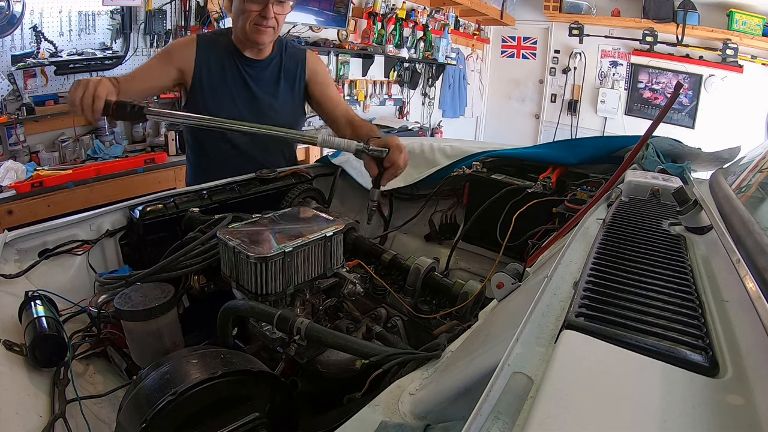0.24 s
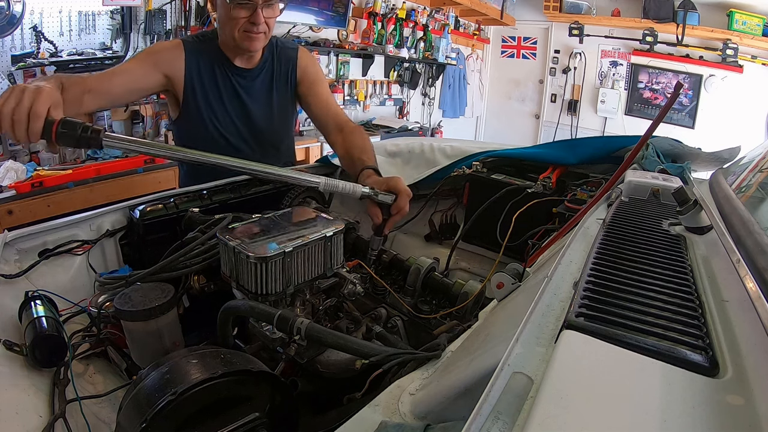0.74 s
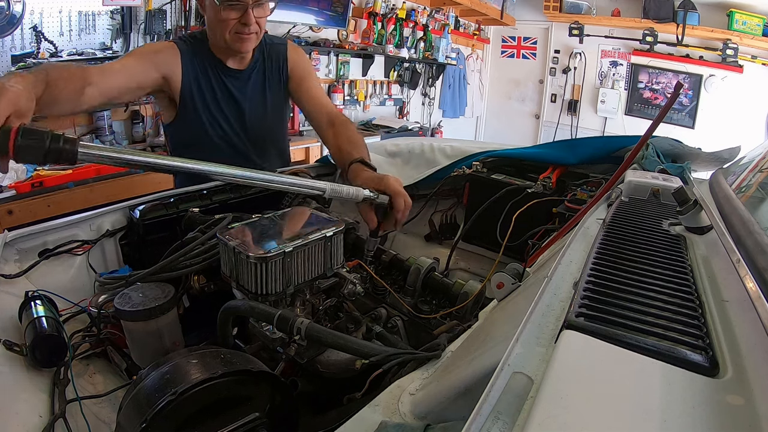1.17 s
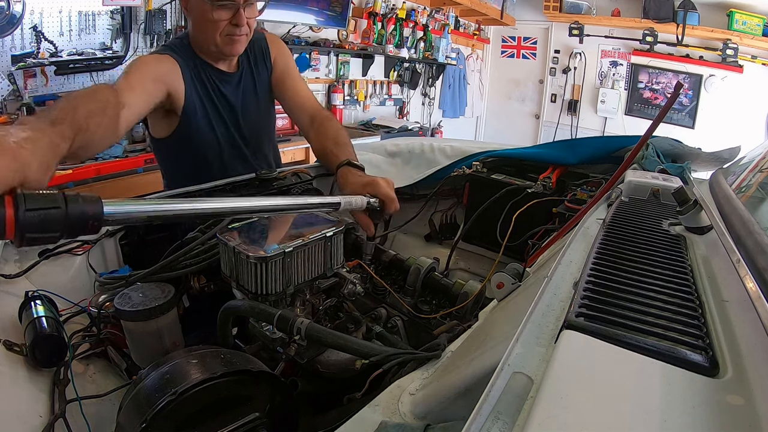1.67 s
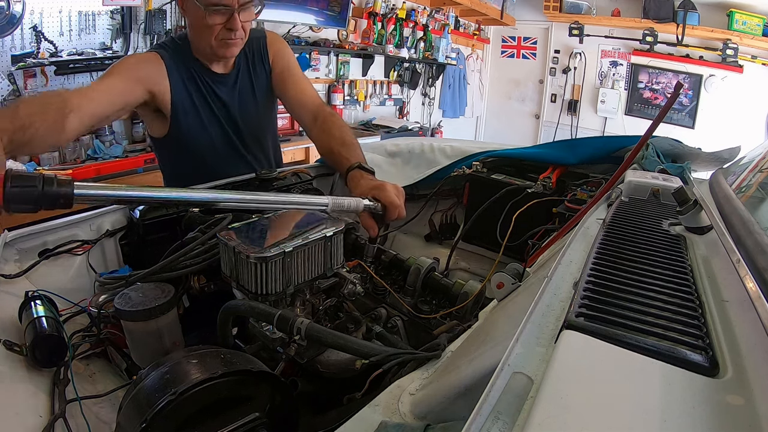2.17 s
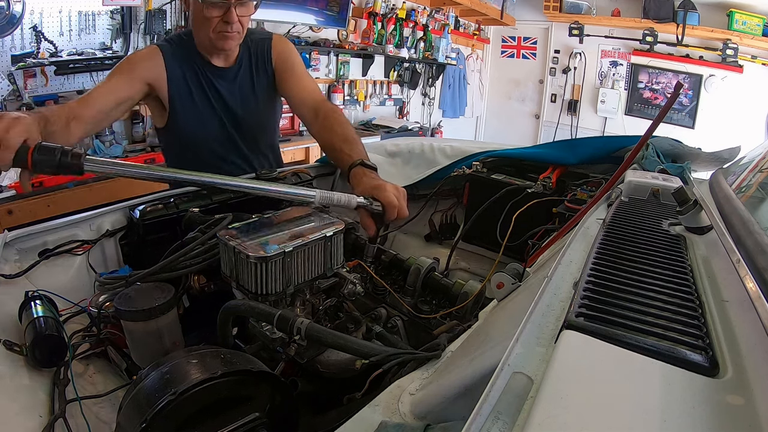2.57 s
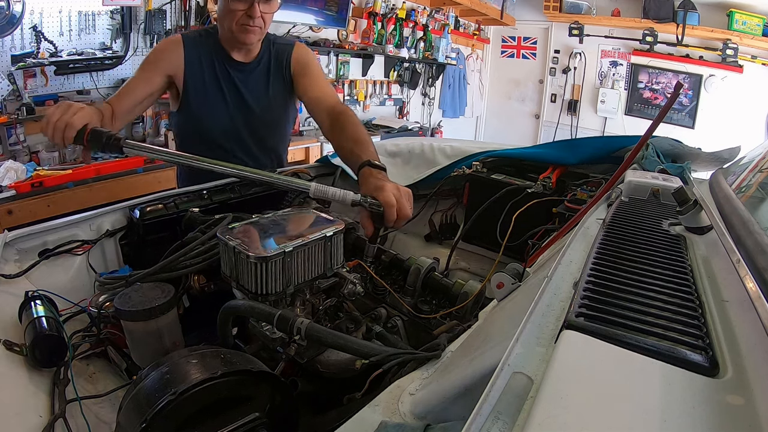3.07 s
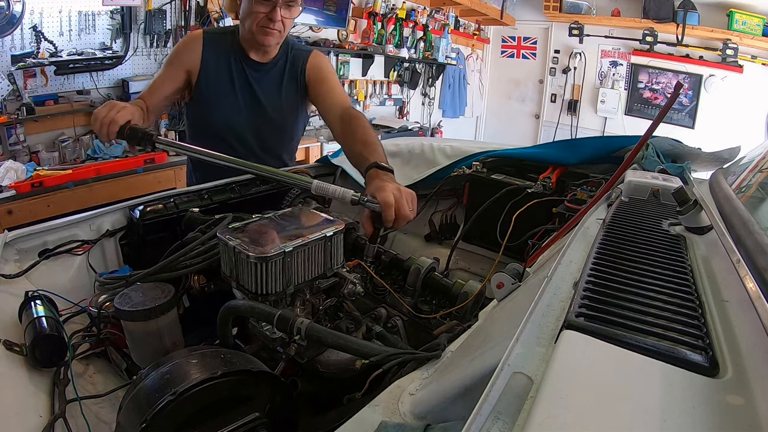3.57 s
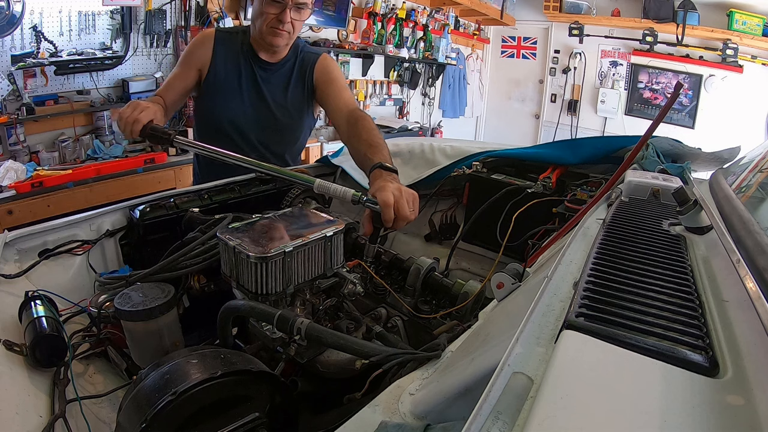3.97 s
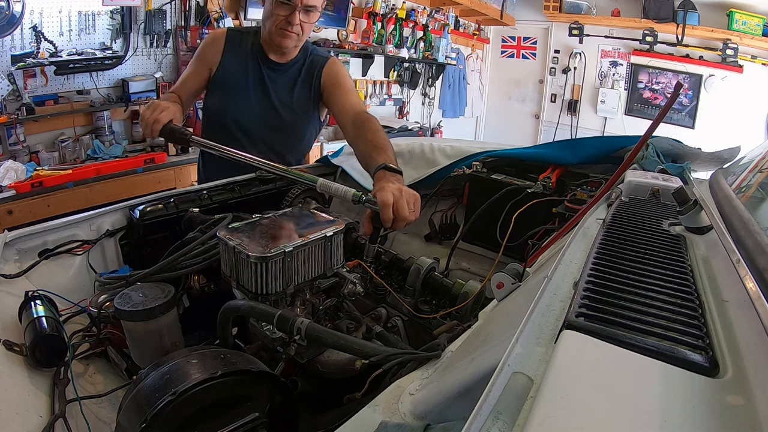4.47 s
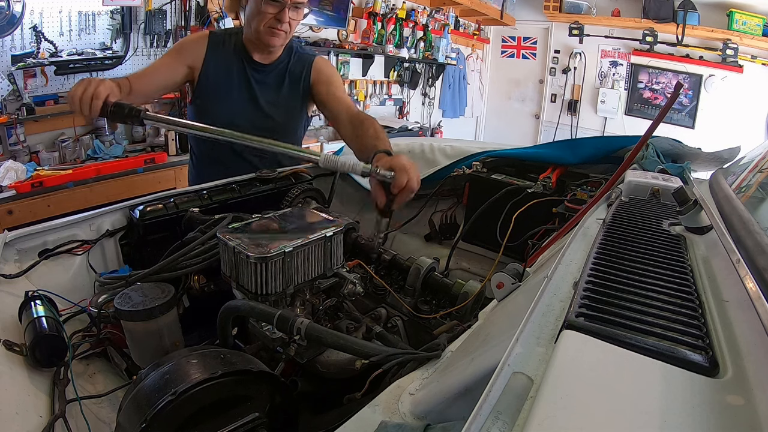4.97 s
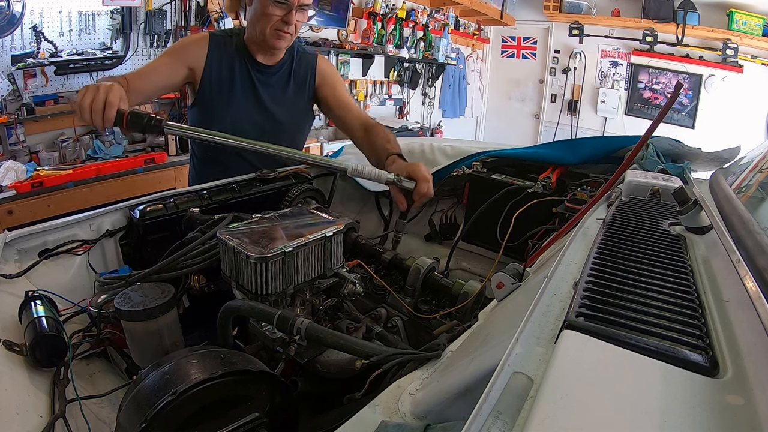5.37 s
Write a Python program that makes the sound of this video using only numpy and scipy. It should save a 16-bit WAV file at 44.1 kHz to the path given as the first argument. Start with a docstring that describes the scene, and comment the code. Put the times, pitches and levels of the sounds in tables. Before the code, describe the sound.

Irregular hard metallic clacks and clicks from a torque wrench on an engine, with faint creaks and short garage echo over very quiet low rumble.

```python
"""A long click-type torque wrench works on an engine bolt in a small garage, over a low rumble and a faint hum.
The socket scrapes, seats and settles, steel creaks and knocks, and the ratchet pawl takes up.
Then the wrench breaks over at its set torque, resets and is lifted off.
Each contact is a dispersed crack, a swarm of rebounds, decaying modes and a diffuse room tail; slides are
swarms of slips, and the background is filtered noise with one steady sine."""
import sys
import numpy as np
from scipy import signal
from scipy.fft import rfft, irfft
from scipy.io import wavfile
from scipy.ndimage import uniform_filter1d

SR = 44100
rng = np.random.default_rng(int(sys.argv[2]) if len(sys.argv) > 2 else 0)


def materialize(psi):
    """Save the field psi as 16-bit PCM at rate SR to the path in sys.argv[1].

    A 1-D psi becomes a single channel; in a 2-D psi each row is a channel.
    """
    bounded = np.clip(np.atleast_2d(psi).T, -1, 1)
    quanta = np.round(bounded * 32767).astype(np.int16)
    wavfile.write(sys.argv[1], SR, quanta)


N = 248283

# relative spectrum of each kind of contact: (frequency [Hz], density [dB per Hz])
COLOUR = { "scrape": [(1180, -22), (2000, -15.5), (3520, -2.5), (5050, -21), (5990, -16.5), (6870, -5.5),
          (7610, -9), (8440, -5.5), (10400, -17), (11600, -37), (13700, -26), (15500, -29)],
          "seat": [(290, -50), (500, -25.5), (888, -19.5), (1180, -13), (1530, -6.5), (1670, -6),
          (2930, -7), (3280, -9), (3960, -8), (5670, -6), (6180, -3), (10100, -19.5), (10800, -35),
          (14000, -36.5), (15500, -46)], "settle": [(350, -46), (600, -36), (1200, -1), (1640, 1),
          (1780, 3.5), (2370, -5.5), (2720, 1), (3770, 1.5), (5900, -5.5), (6490, 0), (7330, -11.5),
          (8630, -4.5), (9370, -10), (10000, -22.5), (15500, -41)], "creak": [(240, -41.5), (400, -6),
          (543, -3.5), (584, -17), (727, -7), (1340, -1), (4550, -9), (5270, -13), (9440, -24),
          (13000, -57.5)], "knock": [(71, -39), (120, -5.5), (208, -11), (245, -15), (319, -6), (375, -25),
          (450, -7.5), (1120, -17), (1530, -10.5), (1990, -15.5), (3970, -11), (5840, -17.5), (7300, -14),
          (9910, -19.5), (15500, -49)], "pawl": [(210, -83), (350, -18.5), (385, -22), (629, -13),
          (906, -18.5), (1190, -11), (1280, -4), (1740, -4), (2980, -1), (5110, 2.5), (5980, -8),
          (9940, -0.5), (11500, -32), (14100, -16), (15500, -53.5)], "break": [(150, -48.5), (250, -11),
          (398, -19.5), (593, -12), (795, -23), (1560, -1.5), (2710, -7), (3390, 0.5), (4170, -10),
          (6100, -0.5), (6880, -11.5), (8470, 0.5), (10600, -16), (11400, -26.5), (15500, -25.5)],
          "reset": [(150, -26), (250, -7.5), (340, -13), (404, -24.5), (540, -10), (736, -20), (1250, -7.5),
          (1820, 0.5), (2160, -15), (2700, -6.5), (5010, -17), (8240, -22), (15000, -60)],
          "lift": [(290, -67), (500, -26), (658, -18), (1240, -15), (1350, -5.5), (1590, -10.5),
          (1730, -6.5), (2310, -9.5), (3090, -5), (4370, -11), (4690, -11.5), (5830, -12.5), (6740, -8),
          (9530, -4.5), (15800, -21)], }
# correlation of left and right in the reflected sound: (frequency [Hz], likeness [-1 to 1])
ROOM_SAME = [(150, 0.055), (230, 0.65), (400, 0.49), (700, 0.0081), (1300, 0.47), (2500, 0.4), (4500, 0.57),
             (8000, 0.81), (15000, 0.91)]


def amp(db):
    """Level law: a gain is ten to the power of its decibels over twenty."""
    return 10 ** (np.asarray(db) / 20)


def unit(x):
    """Energy normalisation: the summed square, averaged over channels, becomes 1."""
    return x / np.sqrt(np.sum(x ** 2, -1).mean() + 1e-20)


def read(points, hz):
    """Interpolation along logarithmic frequency, the scale on which pitch is heard."""
    f, value = np.transpose(points)
    return np.interp(np.log(hz + 1), np.log(f + 1), value)


def add(mix, s, sound):
    """Superposition: a stereo sound is added to the mix from time s."""
    part = mix[:, round(s * SR):][:, :sound.shape[1]]
    part += sound[:, :part.shape[1]]


def causal(db, size=4096):
    """Minimum phase: the Hilbert transform of log gain gives the most compact causal response."""
    both_sides_db = np.r_[db, db[-2:0:-1]]
    log_gain = np.log(amp(np.maximum(both_sides_db, -90)))
    spectrum = np.exp(np.conj(signal.hilbert(log_gain)))
    return np.fft.ifft(spectrum).real[:size // 2]


def pair(two, likeness):
    """Interchannel coherence: two unrelated signals become spectra partly alike, band by band."""
    count = two.shape[1]
    a, b = rfft(two)
    same = np.clip(read(likeness, np.fft.rfftfreq(count, 1 / SR)), -1, 1)
    return np.array([a, same * a + np.sqrt(1 - same ** 2) * b])


def steady(gain, likeness):
    """Stationary random noise: stereo, shaped by a spectral gain, with rms 1."""
    x = irfft(pair(rng.standard_normal((2, N)), likeness) * gain, N)
    return x / x.std()


def air(level_db=-65.5, corner_hz=320):
    """Broadband noise floor: a spectral envelope under a high-pass slope that leaves the lows to the rumble."""
    # relative spectrum of the quiet air: (frequency [Hz], density [dB per Hz])
    air_colour = [(15, -49), (25, -22), (84, 3), (180, -20.5), (223, -13.5), (344, -26), (451, -34.5),
                  (714, -28), (818, -29), (1790, -36), (2350, -46), (5140, -51), (6560, -55), (8830, -48.5),
                  (16000, -84.5)]
    # correlation of left and right: (frequency [Hz], likeness [-1 to 1])
    air_same = [(60, 0.93), (99, 0.84), (160, 0.76), (270, 0.3), (450, 0.11), (740, -0.38), (1220, -0.14),
                (2010, -0.033), (3330, 0.57), (5500, 0.041), (9080, -0.23), (15000, 0.82)]
    hz = np.fft.rfftfreq(N, 1 / SR)
    high_pass = hz ** 4 / (hz ** 4 + corner_hz ** 4)
    return amp(level_db) * steady(amp(read(air_colour, hz)) * high_pass, air_same)


def hum():
    """Pure tone: a steady sine whose peak is root two times its rms."""
    # faint hum: (frequency [Hz], rms level [dB])
    hum_tones = [(118.4, -67.5)]
    t = np.arange(N) / SR
    return sum(amp(db) * np.sqrt(2) * np.sin(2 * np.pi * f * t) for f, db in hum_tones)


def drone(width_hz=14):
    """Frequency translation: low-passed complex noise on a moving carrier is a narrow band that drifts."""
    # distant drone: (time [s], centre frequency [Hz], level [dB])
    drone_course = [(0, 151.7, -67.5), (1.4, 150, -67.5), (1.799, 160, -57), (2.301, 189.6, -65.5),
                    (2.9, 203.3, -58.5), (3.2, 177.4, -72.5), (4.4, 169.6, -66), (5.63, 197.5, -73)]
    s, *columns = np.transpose(drone_course)
    centre, db = (np.interp(np.arange(N) / SR, s, c) for c in columns)
    noise = rng.standard_normal(N) + 1j * rng.standard_normal(N)
    low_pass = signal.butter(2, width_hz, fs=SR, output="sos")
    waver = signal.sosfilt(low_pass, noise)
    x = (waver * np.exp(2j * np.pi * np.cumsum(centre) / SR)).real
    return amp(db) * x / x.std()


def boom(centre_hz, width_hz, pan_db, same):
    """Driven resonance: noise under one bell-shaped peak; pan_db is left minus right."""
    hz = np.fft.rfftfreq(N, 1 / SR)
    gain = 1 / (1 + (2 * (hz - centre_hz) / width_hz) ** 2) ** 1.2
    return amp(np.array([[pan_db], [-pan_db]]) / 2) * steady(gain, [(centre_hz, same)])


def rumble():
    """Amplitude modulation of three resonances: the deep shudders, the middle varies, the upper swells once."""
    # the deep resonance shudders as the wrench is set on and as it breaks over:
    # (start [s], length before the fall [s], level [dB])
    shudders = [(0, 0.068, -49), (4.491, 0.27, -52.5)]
    # middle resonance: (time [s], level [dB])
    middle_level = [(0, -56), (2.1, -62.5), (2.75, -72), (3.25, -61), (4.17, -52), (4.33, -69),
                    (5.1, -71.5), (5.22, -60.5), (5.63, -64)]
    rest_db, rise_s, fall_db_per_s = -76.5, 0.018, 94
    upper_db, swell_db, swell_at_s, swell_width_s = -60.5, 5.5, 2.2, 0.5
    t = np.arange(N) / SR
    deep = amp(rest_db)
    for s, length_s, db in shudders:
        rise = np.clip((t - s) / rise_s, 0, 1)
        deep = deep + rise * amp(db - fall_db_per_s * np.maximum(t - s - length_s, 0))
    middle = amp(np.interp(t, *np.transpose(middle_level)))
    # one broad swell while the bolt is pulled tight
    upper = amp(upper_db + swell_db * np.exp(-((t - swell_at_s) / swell_width_s) ** 2))
    out = deep * boom(45, 14.5, pan_db=-13, same=-0.6)
    out = out + middle * boom(81, 20.5, pan_db=-1, same=0.95)
    return out + upper * boom(192.5, 151.5, pan_db=-2.5, same=0.55)


def background():
    """Superposition of independent sources: quiet air, low rumble, faint hum and drifting drone."""
    return air() + rumble() + hum() + drone()


def garage(build_s=0.0025, dense_s=0.06, count=32768):
    """Room reverberation: sparse echoes thicken into a diffuse tail that decays band by band."""
    # reverberation time: (frequency [Hz], time to fall 60 dB [s])
    room_decay = [(200, 0.81), (700, 0.47), (1500, 0.49), (3500, 0.47), (6000, 0.42), (9000, 0.39),
                  (15000, 0.22)]
    t = np.arange(count) / SR
    density = np.minimum(0.049 + (t / dense_s) ** 2, 1)
    present = rng.random(count) < density
    echoes = rng.standard_normal((2, count)) * present / np.sqrt(density)
    hz, frame_s, z = signal.stft(irfft(pair(echoes, ROOM_SAME)), SR, nperseg=256)
    decay = amp(-60 * frame_s / read(room_decay, hz)[:, None])
    tail = signal.istft(z * decay, SR, nperseg=256)[1]
    return unit(tail[:, :count] * (1 - np.exp(-t / build_s)) ** 2)


def chatter(time_s, per_s=5000, spread_db=4, count=4096):
    """Random impulse train: tiny rebounds and engine-bay echoes swell and soon die away."""
    u = np.arange(count) / SR / time_s
    taps = (rng.random((2, count)) < per_s / SR) * rng.choice([-1, 1], (2, count))
    taps = taps * amp(spread_db * rng.standard_normal((2, count)).clip(-2, 2))
    return irfft(pair(taps, ROOM_SAME)) * np.sqrt(u) * np.exp(-u)


def ring(modes, count=24000):
    """Modal decay: a steel part rings in damped sines; the hands that hold it cap their decay time."""
    longest_s = 0.5
    t = np.arange(count) / SR
    # each mode has a random phase, slightly different at left and right
    phase = 2 * np.pi * rng.random((len(modes), 1, 1)) + 0.38 * rng.standard_normal((len(modes), 2, 1))
    out = np.zeros((2, count))
    for (hz, db, t60), p in zip(modes, phase):
        out += amp(db - 60 * t / min(t60, longest_s)) * np.sin(2 * np.pi * hz * t + p)
    return unit(out)


def resonances(modes, hz, peak_db=5, width_hz=110, size=8):
    """Modal response in dB: peaks at a part's main modes and a random ripple from its many lesser ones."""
    ripple_db = 2.8
    peaks = np.max([1 / (1 + (2 * (hz - f) / width_hz) ** 2) for f, _, _ in modes], 0)
    ripple = uniform_filter1d(rng.standard_normal(len(hz)), size)
    return peak_db * peaks + ripple_db * ripple / ripple.std()


def disperse(x, travel_s=0.0008, at_hz=3000):
    """Bending-wave dispersion: treble travels faster along steel, so a blow spreads into a few cycles."""
    hz = np.fft.rfftfreq(len(x), 1 / SR)
    lag_turns = travel_s * (2 * np.sqrt(hz * at_hz) - hz * np.sqrt(at_hz / hz[-1]))
    return irfft(rfft(x) * np.exp(-2j * np.pi * lag_turns))


def slide(length_s, kind, db, per_s=3000, room_db=-3):
    """Sliding friction: steel rubs on steel in a swarm of tiny slips that grows until the part catches."""
    growth_db = 15.5
    u = np.linspace(0, 1, max(int(length_s * SR), 2))
    present = rng.random(len(u)) < per_s / SR
    slips = rng.standard_normal((2, len(u))) * present * np.sqrt(SR / per_s)
    slips = irfft(pair(slips * amp(growth_db * (u - 1.5)), ROOM_SAME))
    body = unit(causal(read(COLOUR[kind], np.fft.rfftfreq(4096, 1 / SR))))
    rub = signal.fftconvolve(slips, body[None], axes=1)
    out = amp(room_db) * signal.fftconvolve(rub, garage(), axes=1)
    add(out, 0, rub)
    return amp(db) * out


def contact(kind, db, crack_db, crack_hz, pan_db, focus_db=5, contrast=1.6, size=4096):
    """Impact excitation: one steel contact gives a crack, chatter, modal ring and the room's answer."""
    # how each kind sounds: (part that rings, chatter time at the usual crack [s],
    # ring re chatter [dB], room drive re chatter [dB])
    kinds = { "scrape": ("head", 0.0066, -21, -1.3), "seat": ("socket", 0.0033, -7.5, -4),
             "settle": ("socket", .004, -22, -4), "creak": ("head", .005, -24, -1),
             "knock": ("head", 0.0032, -24.5, -5.5), "pawl": ("head", .0035, -23, -2.5),
             "break": ("tube", 0.0043, -11, -0.84), "reset": ("tube", .0035, -27, -6.5),
             "lift": ("head", 0.0042, -29, -2.7), }
    # modes of the steel parts: (frequency [Hz], relative level [dB], time to fall 60 dB before the cap [s])
    steel = { "socket": [(1790, -20, 0.3), (2620, -26, 0.26), (3050, -10.5, 0.49), (3400, -22, 0.35),
             (4040, -11, 0.55), (5080, -15, 0.2), (5260, -9, 0.26), (6040, -8, 0.39), (6600, -17, 5.0),
             (7074, -10, 0.43), (7596, -13, 0.66), (8096, -11, 0.38), (8667, -15, 0.34), (9943, -17, 0.23)],
             "head": [(2840, -6.5, 0.3), (5180, -2, 0.23), (5080, -11, 0.25), (5557, -22, 0.39),
             (6202, -15.5, 0.42), (7280, -12, 0.44), (8050, -4, 0.54), (8450, -16, 0.3), (9500, -2.5, 0.24),
             (9700, -3, 0.26)], "tube": [(1560, -8, 0.28), (2047, -3, 0.11), (2840, -13.5, 0.26),
             (4600, -16, 0.3), (6270, -4, 0.26), (6720, -15.5, 0.31), (7000, -14.5, 0.23),
             (8300, -7.5, 0.23), (8140, -13.5, 0.27), (8660, -7.5, 0.35), (9030, -8, 0.23),
             (9800, -0.5, 0.24)], }
    part, chatter_s, ring_db, room_db = kinds[kind]
    # a harder contact rebounds faster: chatter time halves for every halving_db of crack above the usual
    usual_crack_db, halving_db = -10, 30
    chatter_s = chatter_s * 0.5 ** ((crack_db - usual_crack_db) / halving_db)
    hz = np.fft.rfftfreq(size, 1 / SR)
    colour_db = read(COLOUR[kind], hz)
    body = unit(causal(colour_db + resonances(steel[part], hz)))[None]
    # the first blow favours the strongest resonances in one broad band: low if heavy, high if glancing
    band_db = -np.minimum(focus_db * np.log2((hz + 1) / crack_hz) ** 2, 30)
    crack = disperse(unit(causal(contrast * colour_db + band_db)))
    out = np.zeros((2, SR))
    add(out, 0, amp(crack_db) * np.array([crack, crack]))
    add(out, 0, unit(signal.fftconvolve(chatter(chatter_s), body, axes=1)))
    add(out, chatter_s / 2, amp(ring_db) * ring(steel[part]))
    add(out, chatter_s, amp(room_db) * signal.fftconvolve(garage(), body, axes=1))
    return out * amp(db + np.array([[pan_db], [-pan_db]]) / 2)


def wrench(trim_db=-3.0):
    """Superposition of impacts and friction: all contacts and slides of the tool, under one trim."""
    # steel contacts: (time [s], kind, strength before the trim [dB], first crack re chatter [dB],
    # crack centre [Hz], left minus right [dB])
    contacts = [ (0.142, "scrape", -21.5, -18, 6370, -2.5), (0.171, "scrape", -20.5, -6, 8500, -1),
                (0.233, "creak", -24.5, -28, 4000, -1), (0.8368, "seat", -8.5, -15, 1570, -9.5),
                (0.8416, "seat", 0, -22, 3960, -1), (1.129, "settle", -19, -24.5, 2960, -2),
                (1.1396, "settle", -6.5, -25.5, 2500, -0.5), (1.1508, "settle", -14, -15, 3000, -3),
                (1.516, "creak", -24, -9.5, 4000, -0.5), (1.694, "creak", -22, -14, 1500, 2),
                (1.729, "creak", -22, -26, 2000, 0.5), (1.739, "creak", -19, -28.5, 3000, -0.5),
                (1.755, "creak", -27.5, -4, 3000, -0.5), (2.0142, "knock", -14, -6, 2450, 0.5),
                (2.0309, "knock", -1, -8.5, 1980, -2), (2.037, "knock", -5.5, -11, 6000, -1.5),
                (2.3696, "pawl", -14, 0, 2950, 6), (2.3846, "pawl", 3, 4, 3700, 1),
                (2.3886, "pawl", 4, -11, 4936, -2.5), (2.999, "scrape", -45, -21, 5000, -4),
                (4.467, "break", -34, -7, 3685, 1), (4.4767, "break", -24.5, 2, 3500, 3),
                (4.4876, "break", 4.5, 1, 2380, 1.5), (4.4942, "break", 0.5, -8, 7790, -7),
                (4.7489, "reset", -2.5, -5.5, 1750, -1.5), (5.0623, "lift", -12, -23.5, 3110, 1),
                (5.0672, "lift", -8, -15, 9500, 1.5), (5.0748, "lift", -9.5, 5, 13300, -7.5),
                (5.086, "lift", -11.5, -12, 3030, 0.5), (5.3131, "lift", -22.5, -23.5, 7850, -0.5), ]
    # slides before a part catches: (end [s], length [s], kind, gain before growth and trim [dB])
    slides = [(0.149, 0.059, "scrape", -55), (0.835, .014, "seat", -51), (1.133, 0.033, "settle", -52),
              (5.066, 0.13, "lift", -55)]
    out = np.zeros((2, N))
    for s, *row in contacts:
        add(out, s, contact(*row))
    for end_s, length_s, kind, db in slides:
        add(out, max(end_s - length_s, 0), slide(length_s, kind, db))
    return amp(trim_db) * out


def scene():
    """Linear superposition: the wrench over a background with short fades at both ends."""
    fade = signal.windows.tukey(N, 0.004)
    return wrench() + fade * background()


def record(dry):
    """Saturation and band limiting: the loudest cracks are softly rounded, then low-passed."""
    ceiling, edge_hz = 0.6, 15800
    rounded = dry / (1 + (dry / ceiling) ** 4) ** (1 / 4)
    low_pass = signal.firwin(255, edge_hz, window=("kaiser", 9), fs=SR)
    return signal.oaconvolve(rounded, low_pass[None], "same", axes=1)


dry = scene()
out = record(dry)
materialize(out)
```